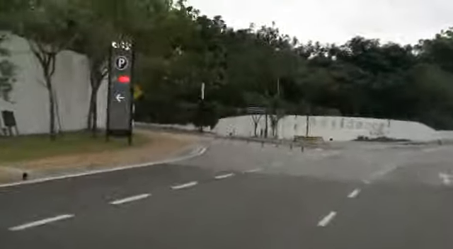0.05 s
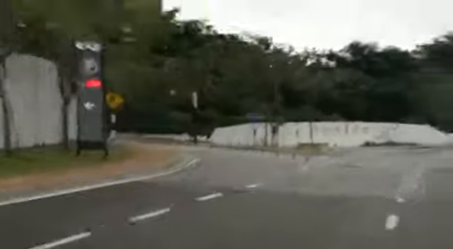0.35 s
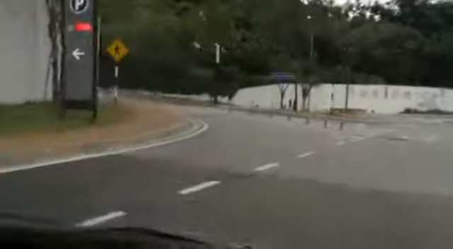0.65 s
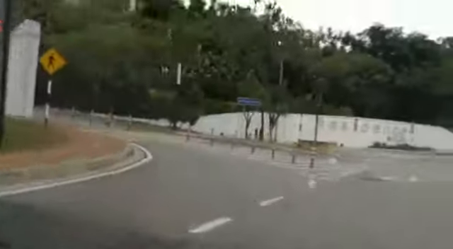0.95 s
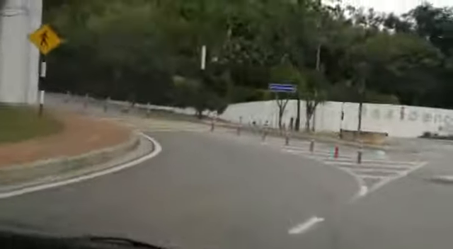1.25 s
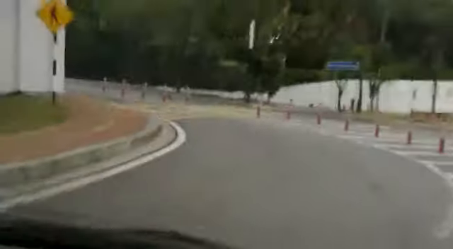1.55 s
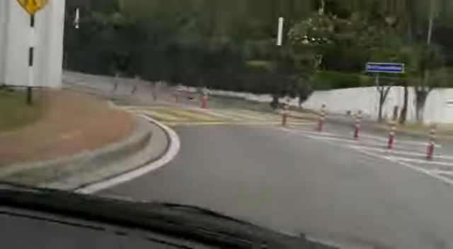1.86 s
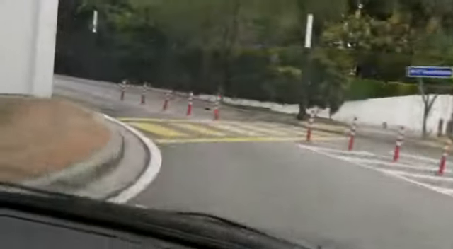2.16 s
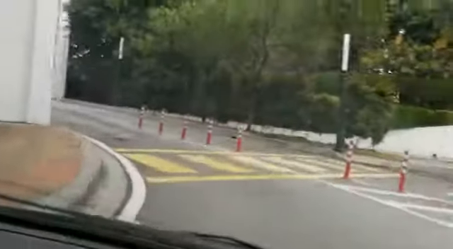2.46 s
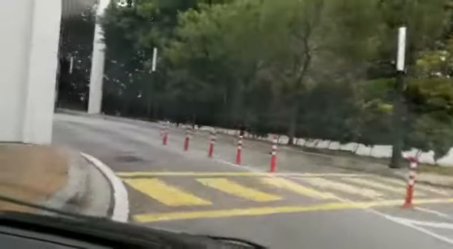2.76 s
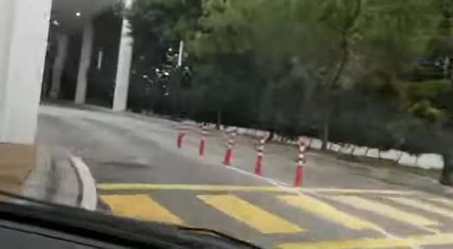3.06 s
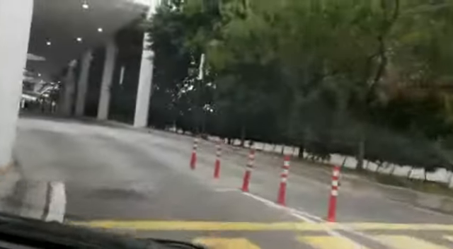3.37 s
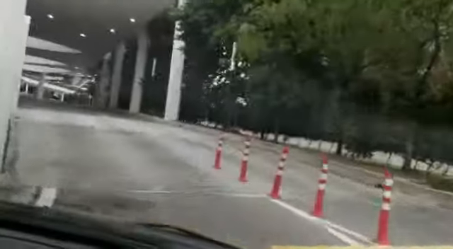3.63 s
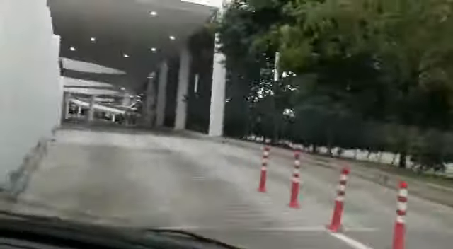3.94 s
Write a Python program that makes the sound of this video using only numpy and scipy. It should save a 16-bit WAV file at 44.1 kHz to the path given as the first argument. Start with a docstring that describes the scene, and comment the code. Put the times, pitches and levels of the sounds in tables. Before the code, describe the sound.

Low road rumble fills a slowly turning car. Sharp clicks sound close to the microphone on the right, then the tyres cross a rough strip with two booms and a gritty scrape. Loose plastic rattles on and off.

```python
"""Inside a car turning slowly into a driveway, the road rumbles through the cabin.
The front and then the rear tyres cross a rough strip with a boom and a gritty scrape of shaken trim.
Loose plastic rattles, hollow panels knock, trim taps and something slides briefly.
The case of a hand-held camera clicks beside its right microphone.
Underneath, the drivetrain hums and the rolling tyres hiss faintly through the glass."""
import sys
import numpy as np
from scipy import signal
from scipy.fft import rfft, irfft
from scipy.io import wavfile
from scipy.ndimage import uniform_filter1d

SR = 44100
rng = np.random.default_rng(int(sys.argv[2]) if len(sys.argv) > 2 else 0)


def log_audio(samples):
    """Write samples as a 16-bit WAV file to the path given in sys.argv[1]."""
    # one column per channel
    frames = np.atleast_2d(samples).T
    # limit to full scale, then quantise
    limited = np.clip(frames, -1, 1)
    pcm = np.round(limited * 32767).astype(np.int16)
    wavfile.write(sys.argv[1], SR, pcm)


N = 176400
TIME = np.arange(N) / SR
HZ = np.fft.rfftfreq(N, 1 / SR)
FRONT_S, REAR_S, CLEAR_S = 1.37, 1.76, 2.13  # front tyres hit the strip, rear tyres hit it, all clear


# How loud the road rumble is: time_s, level_db
RUMBLE_LEVEL = [(0, -33), (.3, -36.5), (.72, -36.5), (.85, -31), (1.0, -37.5), (1.33, -35), (1.42, -23.5),
                (1.57, -19), (1.72, -29.5), (1.96, -17.5), (2.04, -26.5), (2.12, -35.5), (2.22, -38),
                (2.44, -32.5), (4, -35)]
# Its tone on smooth road and during each axle's jolt: pitch_hz, gain_db
SMOOTH_TONE = [(25, -3), (42, 1.5), (86, -0.5), (170, -7.5), (215, -16.5), (255, -13.5), (285, -25.5),
               (345, -20), (475, -38), (650, -37.5)]
FRONT_TONE = [(28, 1.5), (95, 2.5), (185, -2.5), (290, -19.5), (375, -20), (450, -39)]
REAR_TONE = [(28, 2.5), (55, -3.5), (170, -14.5), (400, -39.5)]

def rumble(swell_db=1.5, boom_hz=80, blend_s=0.09, steady_s=0.17):
    """The road shakes the cabin; each axle's jolt changes the tone, and the upper boom swells and dips."""
    front, rear, clear = (np.clip((TIME - s) / blend_s + .5, 0, 1) for s in (FRONT_S, REAR_S, CLEAR_S))
    stages = ((1 - front + clear, SMOOTH_TONE), (front - rear, FRONT_TONE), (rear - clear, REAR_TONE))
    shake = sum(np.sqrt(abs(share)) * cabin_noise(tone) for share, tone in stages)
    window = np.hanning(int(2 * steady_s * SR))
    power = signal.fftconvolve((shake ** 2).mean(0), window / window.sum(), "same")
    strength = np.sqrt(abs(power) + 1e-9)  # dividing by this evens out chance swings in level
    boom = signal.sosfiltfilt(signal.butter(2, boom_hz, "high", fs=SR, output="sos"), shake)
    swell = unit(amp(swell_db * wander(weight=HZ)))
    return amp(curve(RUMBLE_LEVEL)) * (shake + (swell - 1) * boom) / strength


# How loud the gritty scrape is: time_s, level_db
GRIT_LEVEL = [(1.39, -65.5), (1.403, -42), (1.43, -44.5), (1.462, -53), (1.488, -42), (1.62, -42.5),
              (1.72, -48.5), (1.83, -53.5), (1.88, -44.5), (2.01, -44.5), (2.06, -49), (2.12, -62),
              (2.3, -63.5)]
# The tone of its grains: pitch_hz, gain_db
GRIT_TONE = [(300, -0.5), (600, -0.5), (1200, -0.5), (2200, -8.5), (3300, -13.5), (5000, -18.5),
             (9200, -20.5), (10500, -33), (15500, -47)]
# The notes loose plastic rings with, here and in rattle(): pitch_hz, level_db
PLASTIC_NOTES = [(1910, -7.5), (2290, -9), (2900, -10.5), (3620, -24.5), (3900, -14.5), (5450, -3),
                 (6580, -6.5), (7650, -4.5), (8630, -7.5), (9600, -17)]

def grit(gain_db=1, grains_per_s=3500, judder_db=2.5, ring_db=8, width_hz=190):
    """Tiny scrapes ring the plastic as the tyres cross the strip; the rear pair judders more."""
    kicks = rng.standard_normal((2, N)) * (rng.random((2, N)) < grains_per_s / SR)
    grains = reflect(colour(kicks, GRIT_TONE))
    ring = sum(amp(ring_db + db) * signal.lfilter(*signal.iirpeak(hz, hz / width_hz, SR), grains)
               for hz, db in PLASTIC_NOTES)
    judder = unit(uniform_filter1d(rng.standard_normal(N), size=450)) * np.where(TIME > REAR_S, 1, .5)
    return amp(gain_db + curve(GRIT_LEVEL) + judder_db * judder) * unit(grains + ring)


# Each rattle of loose plastic: start_s, level_db, low_boost_db, main_pitch_hz
RATTLES = [(0.1033, -39, 7, 3850), (0.3595, -27, -5, 5570), (0.389, -31, -2.5, 8050),
           (1.713, -23.5, -4, 6830), (1.8445, -23, 0.5, 5460), (1.9387, -31, 0, 8270),
           (1.9967, -28.5, 8, 2160), (2.096, -41.5, 2, 7840), (2.1533, -38.5, -2.5, 6940),
           (2.4318, -26, 2, 3640), (2.4877, -33, 2, 3700), (2.676, -36.5, -0.5, 3910),
           (3.251, -31, -2.5, 3950), (3.6355, -33, -3, 7730), (3.717, -43.5, 0.5, 7450),
           (3.8465, -36, -6.5, 5370), (3.867, -46.5, 0, 5360), (3.887, -48, -9, 6440)]
# The tone all rattles share: pitch_hz, gain_db
RATTLE_TONE = [(300, -1), (1500, -6), (2600, 7.5), (9700, 5.5), (11000, -5), (15500, -16)]

def rattle(level_db, low_boost_db, main_hz, rise_s=0.0002, detune=0.017):
    """Plastic cracks and rings; where it is struck decides which note stands out and how bright it is."""
    t = np.arange(6000) / SR
    cabin_echo = fade(t, 0.092, start_db=-6.5)
    crack = rng.standard_normal((2, len(t))) * (fade(t, 0.017) + cabin_echo)
    notes = [(hz * (1 + detune * rng.standard_normal()), db + 2 * rng.standard_normal())
             for hz, db in PLASTIC_NOTES]
    ring = sum(fade(t, 0.039, db) * np.sin(2 * np.pi * hz * t + np.pi * rng.random((2, 1)))
               for hz, db in notes + [(main_hz, 0.5)])
    hit = colour((crack + amp(-4) * ring) * np.minimum(t / rise_s, 1), RATTLE_TONE)
    top_db = 12 * np.log2(main_hz / 5500)  # a higher main note brightens the top treble
    hit = colour(hit, [(4000, low_boost_db), (5200, 0.0039), (9700, 0), (11500, top_db)])
    left_right_db = np.array([[-14], [-11.5]])
    return amp(level_db + left_right_db) * hit / hit[:, :300].std()  # its first 7 ms set the level


# Each click of the camera case: start_s, level_db, body_db
CASE_CLICKS = [(0.1934, -8, 6), (0.1948, -16, 10), (0.1987, -18.5, -6), (0.205, -15, -4),
               (0.212, -20.5, -32), (0.5534, -9.5, 11), (0.556, -20, -2), (0.5724, -13.5, -34),
               (.579, -21.5, -30), (3.301, -10.5, 9), (.443, -39, 3), (0.9856, -26.5, 15),
               (1.3845, -35.5, 0), (2.567, -37.5, -19)]
# The tone of the snap, of the dull body and of the path to the left microphone: pitch_hz, gain_db
SNAP_TONE = [(2000, -28), (4500, -11.5), (6300, -3), (9600, 3.5), (10800, 0), (12000, -23)]
BODY_TONE = [(300, 10.5), (600, -4.5), (1200, 2), (1900, -12.5), (2900, -1.5), (4300, -8), (7500, -3.5),
             (15000, -15.5)]
LEFT_PATH_TONE = [(400, -14.5), (1800, -29), (8500, -18)]

def click(level_db, body_db, gain_db=1, tail_db=-10.5):
    """The case carries a sharp snap and a duller body sound mostly to the right microphone."""
    t = np.arange(2500) / SR
    push = rng.standard_normal((2, len(t))) * fade(t, 0.038)
    push *= amp(tail_db) / np.linalg.norm(push[0])
    push[:, 0] += 1  # one sharp kick leads the noisy tail
    sound = colour(push, SNAP_TONE) + amp(body_db) * colour(push, BODY_TONE)
    sound[:1] = colour(sound[:1], LEFT_PATH_TONE)
    return amp(level_db + gain_db) * sound / abs(sound[1]).max()


# Knocks, booms and squeaks of hollow panels: start_s, pitch_hz, level_db, fade_s
PANEL_KNOCKS = [(.194, 336, -29, 0.047), (.194, 504, -25.5, 0.042), (0.199, 89, -15.5, 0.053),
                (.553, 319, -20.5, 0.037), (.553, 605, -27, .036), (.553, 900, -26.5, 0.03),
                (.832, 171, -30, 0.21), (1.399, 1199, -37, 0.25), (1.53, 142.4, -22, 0.6),
                (2.945, 494, -54, 0.092), (3.007, 645, -42.5, 0.15), (3.009, 785, -42.5, 0.079),
                (3.253, 263, -29, 0.069)]

def knock(pitch_hz, level_db, fade_s, buzz=0.31, rise_s=0.0024, size=16000):
    """A panel rings with one slightly buzzing note; higher notes reach the two sides out of step."""
    t = np.arange(size) / SR
    smoother = signal.butter(2, pitch_hz / 10, fs=SR, output="sos")
    wobble = unit(signal.sosfilt(smoother, rng.standard_normal(2 * size))[size:])
    phase = np.outer([.5, -.5], np.arccos(likeness(pitch_hz)))
    loudness = fade(t, fade_s, level_db) * np.minimum(t / rise_s, 1) * (1 + buzz * wobble)
    return loudness * np.sin(2 * np.pi * pitch_hz * t + phase)


# How loud the sliding is: time_s, level_db
SLIDE_LEVEL = [(.66, -71), (.689, -49), (.695, -36.5), (.708, -51), (.725, -51), (.739, -34), (.75, -46),
               (.765, -41), (.78, -52.5), (.9, -75.5)]
# Its hissy tone: pitch_hz, gain_db
SLIDE_TONE = [(3500, -14), (5000, -4), (7400, 1.5), (8200, 0), (12000, -11.5), (15500, -17)]

def slide(gain_db=-2):
    """Something smooth slides with a short swish."""
    sliding = TIME < SLIDE_LEVEL[-1][0]
    return amp(curve(SLIDE_LEVEL) + gain_db) * sliding * cabin_noise(SLIDE_TONE)


# Each small tap of trim: start_s, level_db
TRIM_TAPS = [(.147, -49.5), (.502, -56), (1.144, -52.5), (1.2, -55)]

def tap(level_db, pitch_hz=1940, sharpness=3, fade_s=0.068):
    """Trim gives a dull, dry tap: a burst of noise around one pitch."""
    t = np.arange(6000) / SR
    burst = signal.lfilter(*signal.iirpeak(pitch_hz, sharpness, SR), rng.standard_normal((2, len(t))))
    return fade(t, fade_s, level_db) * unit(burst)


# How loud the drivetrain is: time_s, level_db
HUM_LEVEL = [(0, -56), (.55, -52), (1.65, -44), (2.1, -58.5), (4, -54.5)]

def hum(pitch_hz=254.5, waver_hz=5, flutter=0.37):
    """The drivetrain hums one note that wavers in pitch and loudness."""
    turns = np.cumsum(pitch_hz + waver_hz * wander()) / SR
    swell = 1 + flutter * wander()
    return amp(curve(HUM_LEVEL)) * unit(swell * np.sin(2 * np.pi * turns))


# How loud the rolling tyres are: time_s, middle_db, treble_db
TYRE_LEVELS = [(0, -52, -73.5), (.3, -53.5, -72.5), (1.35, -56.5, -73.5), (2.2, -60.5, -64.5),
               (2.38, -63, -74.5), (2.62, -59.5, -62.5), (2.76, -92, -70.5), (2.95, -55.5, -70),
               (3.35, -76, -76), (4, -57, -73)]
# The tone of their middle and treble parts: pitch_hz, gain_db
MIDDLE_TONE = [(300, 13.5), (500, 7.5), (800, -1), (1200, 1), (1600, -14.5), (2000, -10.5), (2900, -20.5),
               (5000, -45.5)]
TREBLE_TONE = [(2000, -7), (3500, -2.5), (5500, 1), (9500, -0.5), (11500, -4.5), (15500, -8.5)]

def tyres(flicker_db=2.5):
    """Faint rolling noise comes through the glass, flickering with the road's texture."""
    flicker = unit(uniform_filter1d(rng.standard_normal((2, N)), size=2200))
    levels_db = np.array([curve(TYRE_LEVELS), curve(TYRE_LEVELS, column=2)])
    middle, treble = amp(levels_db + flicker_db * flicker)
    return middle * cabin_noise(MIDDLE_TONE) + treble * cabin_noise(TREBLE_TONE)


# How alike left and right sound in the cabin: pitch_hz, likeness
CABIN_LIKENESS = [(60, .999), (160, 0.97), (330, 0.5), (550, -0.4), (1400, -0.19)]

def likeness(hz):
    """Gives 1 where both sides move together, 0 where unrelated and -1 where opposite."""
    return np.clip(read(CABIN_LIKENESS, hz), -1, 1)


def cabin_noise(tone):
    """Stereo noise that falls away past the ends of its tone table; the bass is alike on both sides."""
    mid, side = rfft(rng.standard_normal((2, N)))
    mid *= np.sqrt(1 + likeness(HZ))
    side *= np.sqrt(1 - likeness(HZ))
    roll_off = np.minimum(HZ / tone[0][0], 1) ** 2 / np.maximum(HZ / tone[-1][0], 1) ** 2
    return unit(irfft(np.array([mid + side, mid - side]) * amp(read(tone, HZ)) * roll_off, N))


def reflect(sound, count=12, longest_s=0.012, echo_db=-8.5):
    """Quick echoes off the glass and dashboard make a sound hollow."""
    out = sound.copy()
    gain = amp(echo_db) / np.sqrt(count)
    for side in range(len(sound)):
        for delay, sign in zip(rng.random(count), rng.choice([-1, 1], count)):
            out[side] += sign * gain * np.roll(sound[side], int(delay * longest_s * SR))
    return unit(out)


def colour(sound, tone, size=2048):
    """Filters a sound by a tone table, with no ringing ahead of a hit."""
    log_gain = np.log(amp(read(tone, abs(np.fft.fftfreq(size, 1 / SR)))))
    response = np.fft.ifft(np.exp(np.conj(signal.hilbert(log_gain)))).real[:size // 2]
    return signal.fftconvolve(sound, response[None], axes=1)[:, :sound.shape[1]]


def wander(weight=1, speed_hz=10):
    """A slow random wobble; weight favours some wobble speeds over others."""
    return unit(irfft(rfft(rng.standard_normal(N)) * np.exp(-(HZ / speed_hz) ** 2) * weight, N))


def fade(t, fade_s, start_db=0):
    """A gain that drops by 60 dB every fade_s seconds."""
    return amp(start_db - 60 * t / fade_s)


def amp(db):
    """Turns decibels into a gain."""
    return 10 ** (np.asarray(db) / 20)


def unit(x):
    """Scales a signal to an average power of 1."""
    return x / np.sqrt(np.mean(x ** 2) + 1e-20)


def read(table, hz):
    """Looks up a pitch in a table, blending between rows on an octave scale."""
    pitches, values = np.transpose(table)
    return np.interp(np.log(hz + 1), np.log(pitches + 1), values)


def curve(table, column=1):
    """Reads one column of a time table at every sample."""
    rows = np.asarray(table)
    return np.interp(TIME, rows[:, 0], rows[:, column])


def add(mix, start_s, sound):
    """Mixes a sound in at start_s."""
    part = mix[:, max(round(start_s * SR), 0):][:, :sound.shape[-1]]
    part += sound[..., :part.shape[1]]


def scene():
    """Road sounds with the small cabin noises on top."""
    mix = rumble() + hum() + tyres() + grit() + slide()
    events = ((rattle, RATTLES), (click, CASE_CLICKS), (knock, PANEL_KNOCKS), (tap, TRIM_TAPS))
    for source, table in events:
        for start_s, *settings in table:
            add(mix, start_s, source(*settings))
    return mix


def record(dry, top_hz=16000):
    """Cuts away the very highest treble."""
    low_pass = signal.firwin(255, top_hz, window=("kaiser", 9), fs=SR)
    return signal.oaconvolve(dry, low_pass[None], "same")


dry = scene()
out = record(dry)
log_audio(out)
```